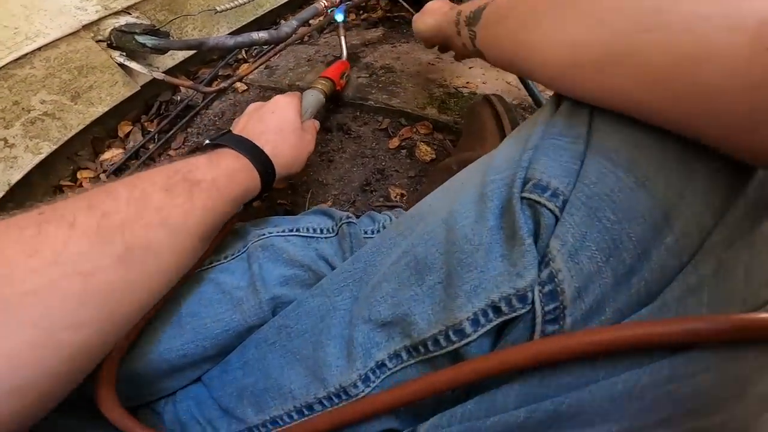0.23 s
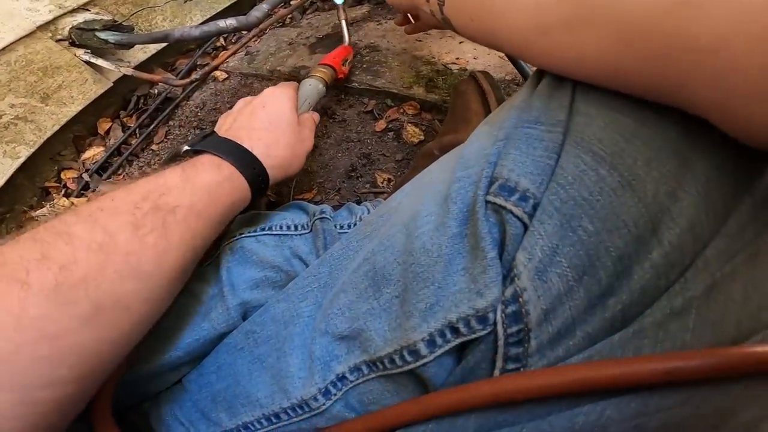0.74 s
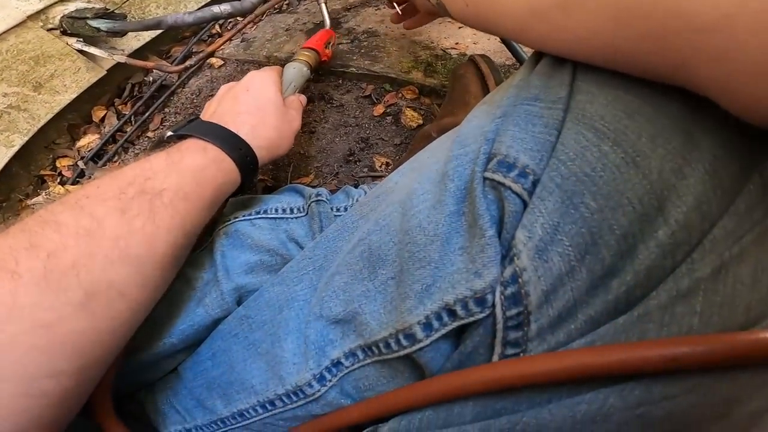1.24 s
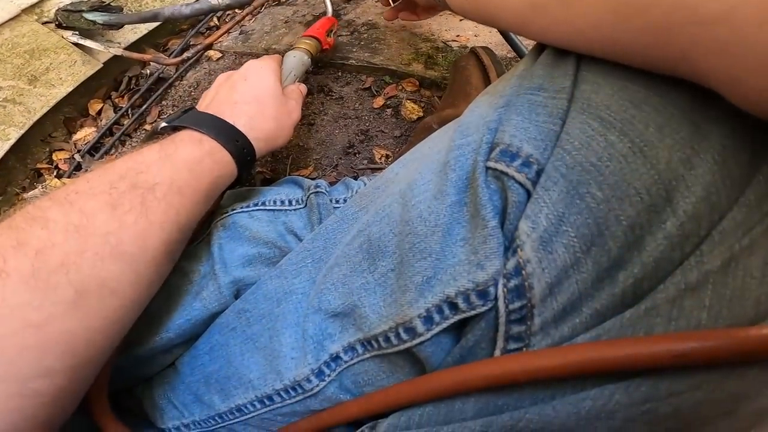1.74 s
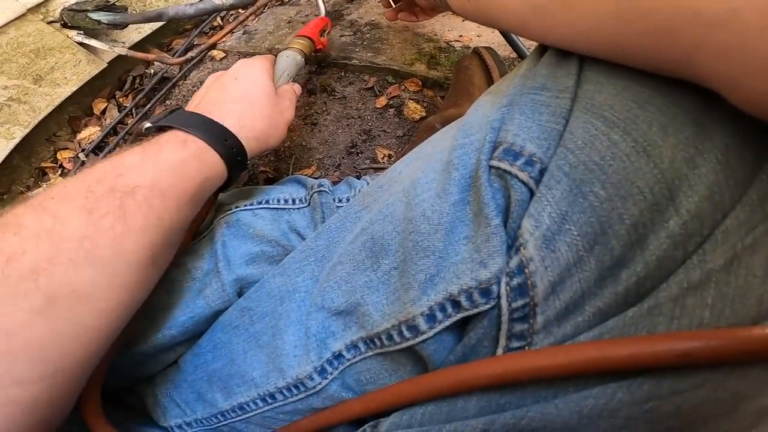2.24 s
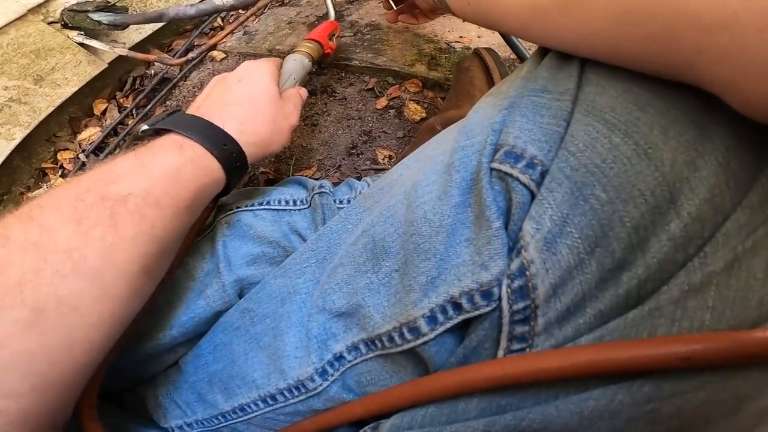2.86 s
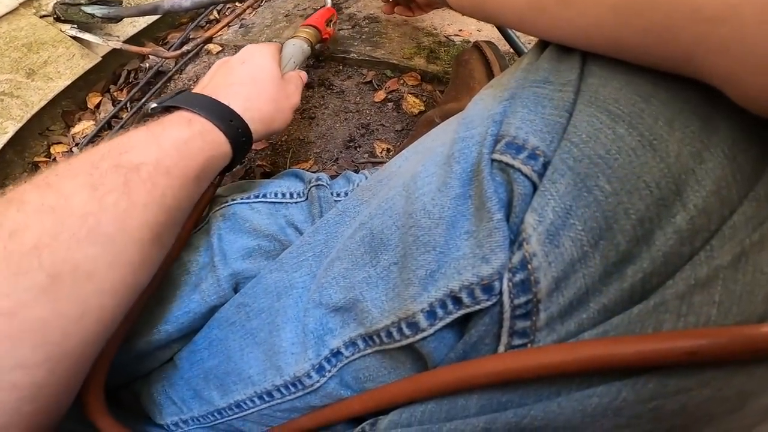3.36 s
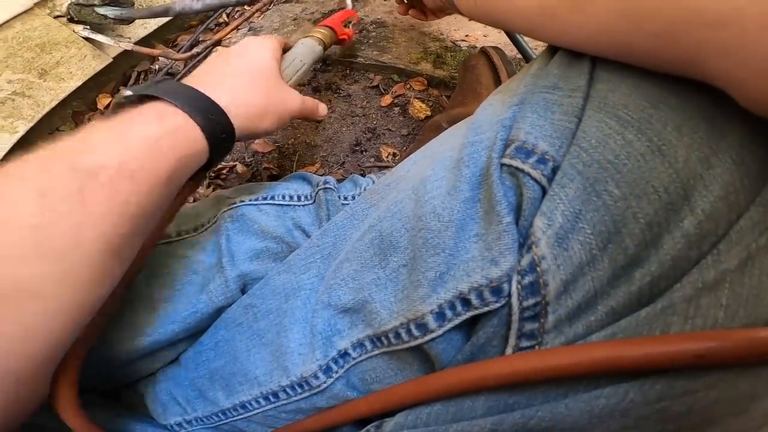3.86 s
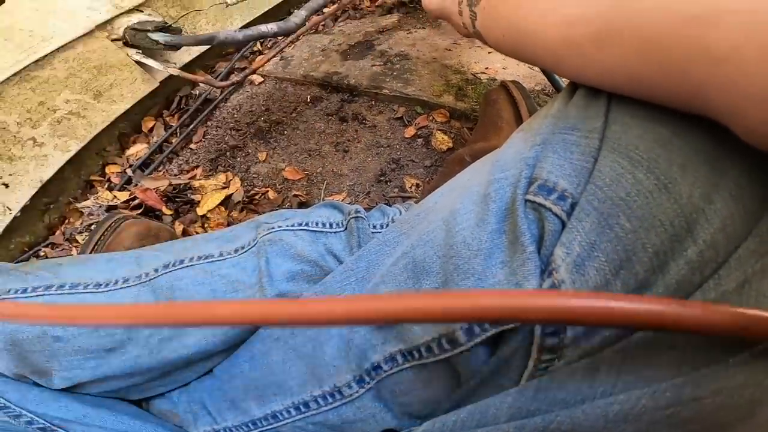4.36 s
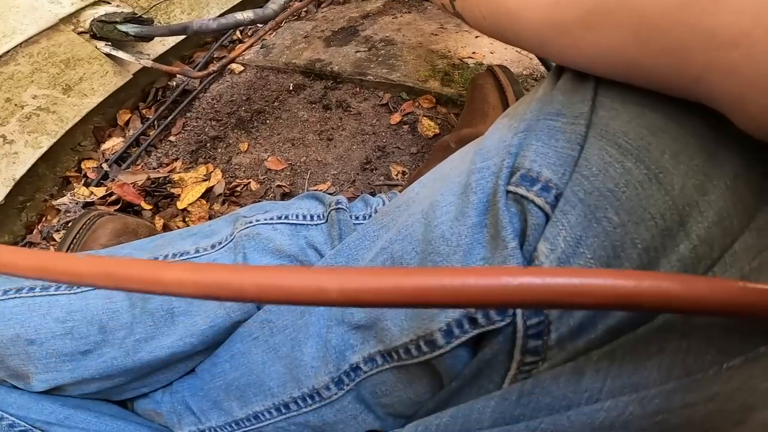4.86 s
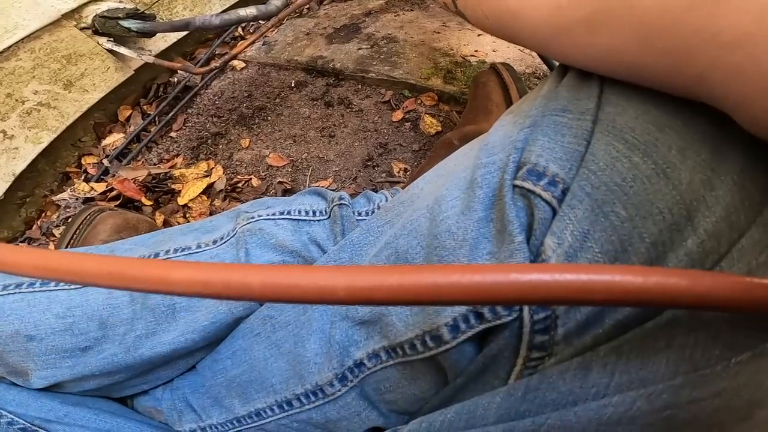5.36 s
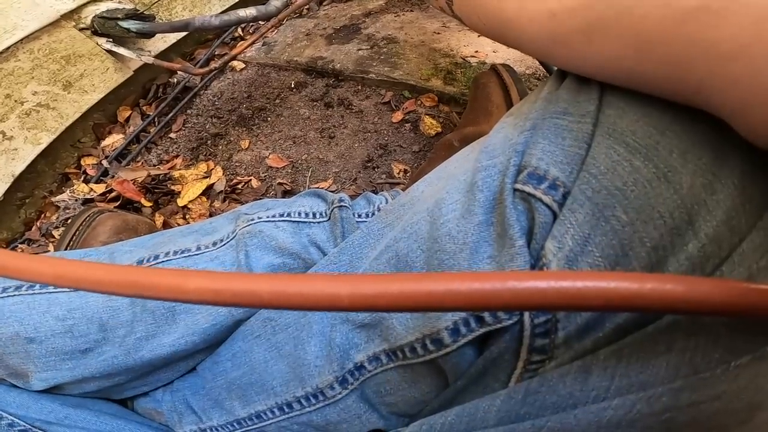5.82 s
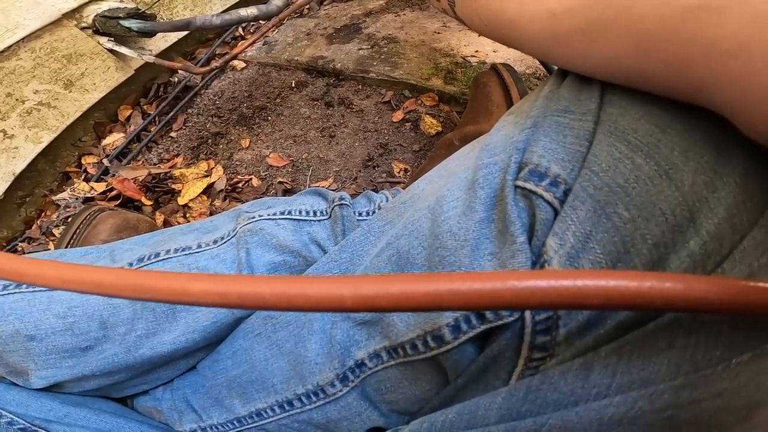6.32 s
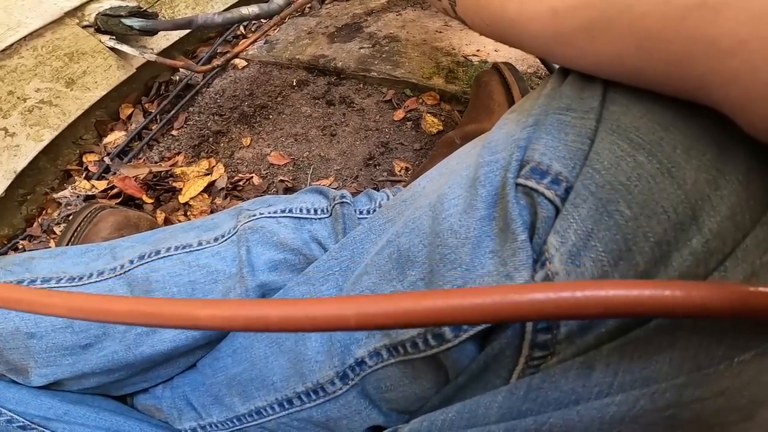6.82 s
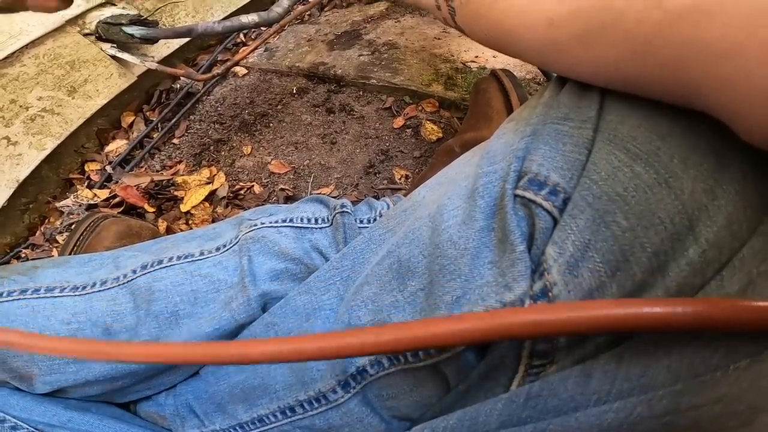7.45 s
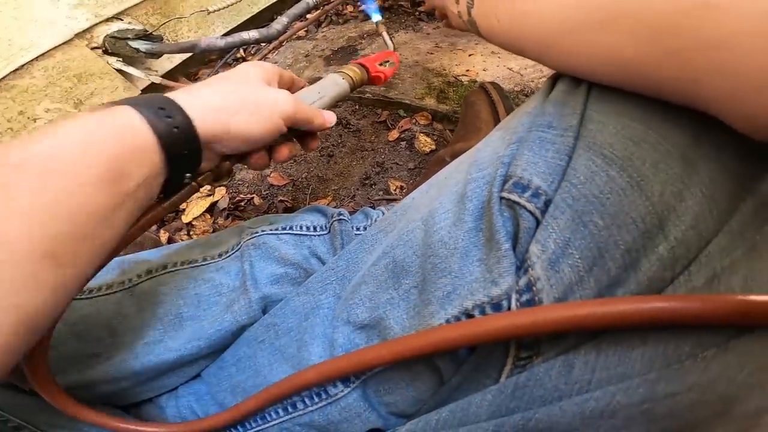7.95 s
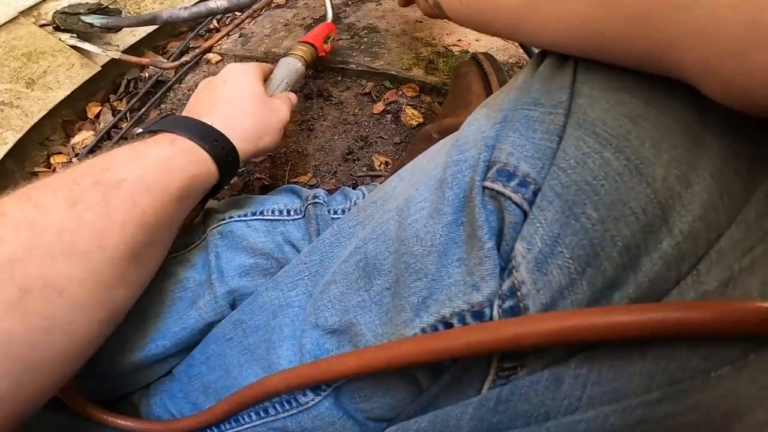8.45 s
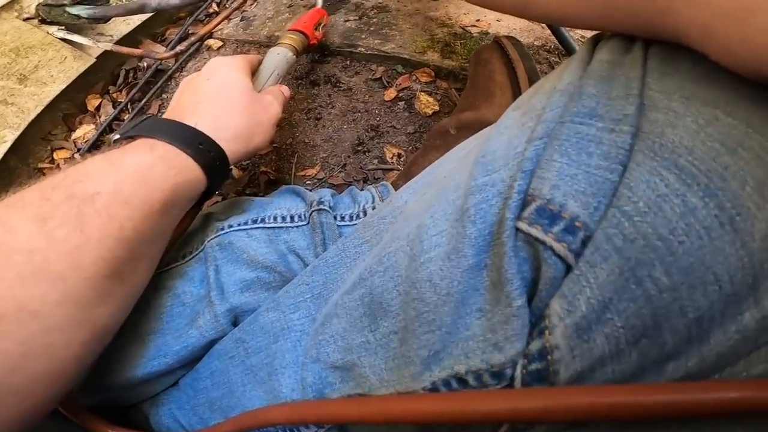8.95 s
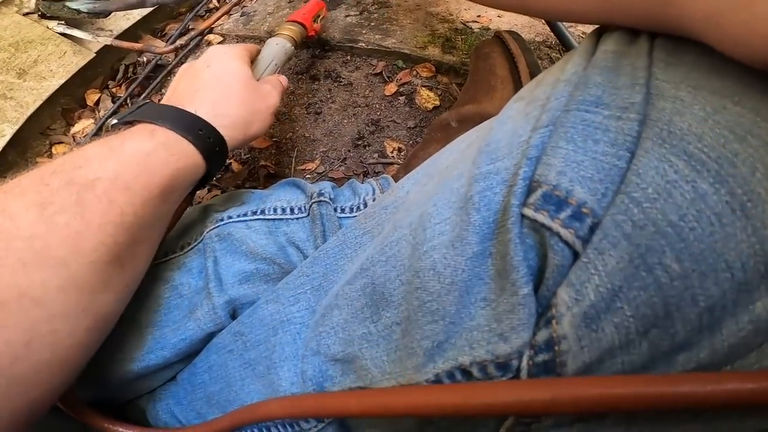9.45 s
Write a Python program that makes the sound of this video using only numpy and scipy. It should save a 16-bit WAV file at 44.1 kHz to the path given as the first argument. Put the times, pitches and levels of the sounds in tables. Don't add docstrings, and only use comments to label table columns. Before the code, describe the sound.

Constant, dense jet noise from a brazing torch at arm's length, mostly a bright mid-high hiss with a blurry whistling edge and much quieter low rumble. Close reflections from wall, ground and body give it a hollow, flanger-like colour that slides whenever the hand moves: briefly at first, then moving away midway and coming back later. Level stays nearly even, with slight flutter. A distant motor hums faintly below in the last second or so.

```python
import sys
import numpy as np
from scipy import signal
from scipy.fft import rfft, irfft
from scipy.io import wavfile
from scipy.ndimage import uniform_filter1d, map_coordinates

SR = 44100
rng = np.random.default_rng(int(sys.argv[2]) if len(sys.argv) > 2 else 0)


def unload_audio(sound):
    columns = np.transpose(np.atleast_2d(sound))
    steps = np.round(np.clip(columns, -1, 1) * 32767)
    wavfile.write(sys.argv[1], SR, steps.astype(np.int16))


def level_to_linear(level):
    exponent = np.asarray(level, float) / 20
    return 10 ** exponent


N = 427329
FRAME = 1024


def along(points, hz):
    point_hz, value = np.transpose(points)
    return np.interp(np.log(hz + 1), np.log(point_hz + 1), value)


def curves(rows, t):
    row_s, *columns = np.transpose(rows)
    return [np.interp(t, row_s, column) for column in columns]


def noise(channels):
    return signal.stft(rng.standard_normal((channels, N)), SR, "cosine", FRAME)


def wobble(knots_per_s, t):
    knots = rng.standard_normal(int(N / SR * 60) + 4)
    return map_coordinates(knots, [t * knots_per_s])


def shaped(gain):
    all_but_time = tuple(range(gain.ndim - 1))
    return gain / np.sqrt(np.mean(gain ** 2, axis=all_but_time))


def delayed(hz, extra_ms):
    return np.exp(-2j * np.pi / 1000 * hz * extra_ms)


# start_s, level_db
ENGINE_LEVEL = [
    (0.0, -52),
    (0.13, -43),
    (6.48, -58),
    (6.8, -63),
    (7.21, -54),
    (8.53, -36),
    (9.07, -49),
    (9.69, -37),
]


def engine():
    firing_hz, half_width_hz = 71, 4
    hz = np.fft.rfftfreq(N, 1 / SR)
    line = 1 / (1 + ((hz - firing_hz) / half_width_hz) ** 2)
    hum = irfft(rfft(rng.standard_normal(N)) * line, N)
    level_db = curves(ENGINE_LEVEL, np.arange(N) / SR)[0] - 3
    return hum / hum.std() * level_to_linear(level_db)


# start_s, travel_cm
TRAVEL = [(0, 1), (.45, 6.8), (1.3, 7.8), (3.85, 15.7), (4.55, 48), (5, 67.4), (6.3, 58.8), (7.5, 57),
          (8.1, 94), (8.9, 103), (9.69, 89)]


def late_cloud(hz, t, count=10):
    skew_ms = 0.25
    spread, facing, skew = rng.uniform(-1, 1, (count, 3)).T[..., None, None]
    travel_cm = curves(TRAVEL, t)[0]
    swing = 1 + np.abs(np.gradient(travel_cm, t)) / 70
    travel_ms = facing * travel_cm / 34.3
    path_ms = 3 + 1.6 * spread + travel_ms + skew_ms * skew * [[1], [-1]]
    cloud = sum(delayed(hz[:, None], ms[:, None]) for ms in path_ms)
    return swing * cloud / np.sqrt(count)


# extra_left_ms, extra_right_ms, signed_strength
UNDER = [(0.288, 0.254, -0.05), (0.3, 0.289, 0.13), (0.779, 0.776, -0.21), (0.908, 0.898, 0.12),
         (0.956, 0.971, -0.09), (1.159, 1.136, 0.09), (1.205, 1.198, 0.1), (1.332, 1.307, 0.04),
         (1.61, 1.608, -0.1), (1.701, 1.685, -0.15), (1.747, 1.812, 0.07), (1.992, 2.009, -0.1),
         (2.347, 2.437, 0.06), (2.858, 2.858, -0.04)]
BESIDE = [(0.303, 0.244, -0.01), (0.468, 0.55, -0.08), (0.66, 0.701, -0.13), (0.761, 0.766, -0.15),
          (0.964, 0.953, -0.15), (1.126, 1.118, 0.08), (1.555, 1.621, -0.12), (1.675, 1.703, -0.16),
          (1.967, 1.976, -0.06), (2.046, 2.072, -0.08), (2.216, 2.393, 0.05), (2.496, 2.52, -0.04),
          (2.598, 2.569, 0.04), (2.717, 2.736, -0.05)]
ABOVE = [(0.656, 0.698, -0.14), (0.749, 0.74, -0.07), (0.911, 0.907, -0.15), (1.098, 1.089, 0.12),
         (1.371, 1.279, 0.06), (1.498, 1.481, -0.1), (1.645, 1.669, -0.1), (1.721, 1.749, -0.09),
         (1.974, 2.032, -0.09), (2.25, 2.2, 0.08), (2.356, 2.359, 0.05), (2.474, 2.478, -0.05),
         (2.977, 3.013, 0.03), (3.197, 3.227, 0.05)]
BEHIND = [(0.419, 0.353, 0.11), (0.553, 0.571, 0.03), (0.902, 0.896, -0.15), (1.035, 1.021, 0.15),
          (1.121, 1.109, 0.1), (1.269, 1.204, 0.07), (1.607, 1.657, -0.1), (1.802, 1.791, 0.09),
          (1.925, 1.92, -0.07), (2.017, 2.004, -0.11), (2.278, 2.183, 0.09), (2.352, 2.319, 0.09),
          (2.445, 2.569, -0.05), (2.637, 2.664, 0.03)]
ASIDE = [(0.265, 0.274, -0.16), (0.292, 0.302, 0.22), (0.58, 0.538, 0.12), (0.621, 0.701, -0.09),
         (0.821, 0.804, -0.07), (1.074, 1.06, 0.1), (1.354, 1.361, 0.1), (1.504, 1.494, -0.12),
         (1.698, 1.704, -0.06), (2.001, 2.007, -0.12), (2.039, 2.162, 0.07), (2.212, 2.217, 0.04),
         (2.959, 2.967, 0.04), (3.165, 3.246, 0.05)]
LIFTED = [(0.42, 0.412, -0.09), (0.669, 0.684, 0.11), (0.752, 0.725, -0.05), (0.85, 0.856, -0.15),
          (1.0, 1.044, 0.09), (1.204, 1.179, 0.12), (1.589, 1.64, -0.11), (1.908, 1.912, -0.11),
          (2.137, 2.148, 0.09), (2.676, 2.692, 0.06)]
SWUNG = [(0.268, 0.26, -0.24), (0.659, 0.601, 0.19), (1.02, 0.992, 0.06), (1.107, 1.113, -0.1),
         (1.167, 1.246, -0.07), (1.358, 1.331, -0.09), (1.763, 1.777, 0.1), (1.997, 1.99, -0.09),
         (2.319, 2.286, -0.06), (2.748, 2.75, 0.06)]
TURNED = [(0.323, 0.264, -0.16), (0.352, 0.431, 0.17), (0.604, 0.585, 0.06), (0.741, 0.727, -0.13),
          (1.353, 1.349, -0.07), (1.649, 1.617, 0.12), (2.445, 2.458, -0.06), (2.614, 2.573, 0.07),
          (3.143, 3.279, -0.07), (3.792, 3.741, 0.05)]
RESTING = [(0.243, 0.247, -0.13), (0.331, 0.347, 0.06), (0.529, 0.575, 0.02), (0.736, 0.764, -0.06),
           (0.869, 0.919, -0.07), (1.092, 1.082, 0.09), (1.284, 1.286, 0.05), (1.52, 1.531, -0.12),
           (1.712, 1.729, -0.05), (1.827, 1.84, -0.05), (2.001, 2.008, -0.11), (2.543, 2.544, 0.06),
           (2.662, 2.697, -0.04), (2.779, 2.833, -0.04)]
PULLED = [(0.393, 0.343, -0.08), (0.431, 0.435, 0.12), (0.819, 0.703, -0.08), (1.217, 1.212, 0.09),
          (1.734, 1.796, -0.05), (1.851, 1.833, 0.04), (2.192, 2.18, -0.07), (2.56, 2.562, 0.07),
          (3.361, 3.319, -0.05), (3.652, 3.686, 0.04)]
RAISED = [(0.251, 0.276, 0.14), (0.417, 0.433, 0.13), (0.693, 0.68, -0.08), (0.78, 0.759, -0.12),
          (0.862, 0.852, -0.19), (1.183, 1.19, 0.12), (1.314, 1.268, 0.09), (1.667, 1.658, -0.15),
          (1.86, 1.868, 0.05), (2.743, 2.726, -0.05)]
LEANING = [(0.352, 0.388, 0.08), (0.497, 0.529, -0.13), (0.546, 0.555, 0.16), (0.725, 0.714, -0.15),
           (0.865, 0.859, 0.14), (0.907, 0.906, -0.15), (1.054, 1.049, 0.07), (1.233, 1.29, 0.09),
           (1.427, 1.437, 0.06), (1.541, 1.542, -0.1), (1.702, 1.784, -0.08), (2.322, 2.289, 0.08),
           (2.514, 2.499, -0.05), (3.179, 3.177, 0.04)]
# start_s, pose_reached, path_stretch_ratio
HAND = [(0, UNDER, 1.01), (.15, LIFTED, 0.98), (.28, LIFTED, 1), (.35, UNDER, 0.89), (.45, UNDER, 1.019),
        (1.12, UNDER, 0.983), (1.4, BESIDE, 0.97), (2.1, BESIDE, 1.01), (2.3, LEANING, 0.99),
        (2.85, LEANING, 1.01), (3.05, ABOVE, 1.004), (3.88, ABOVE, 1.01), (3.98, PULLED, .98),
        (4.15, PULLED, 1.02), (4.27, SWUNG, 1.02), (4.44, SWUNG, 1), (4.52, ASIDE, 1.075), (5.1, ASIDE, 1),
        (6.5, ASIDE, 1.014), (7.0, RESTING, 1.004), (7.5, RESTING, 1.02), (7.63, RESTING, 1.106),
        (7.78, TURNED, 1.001), (8.0, UNDER, 1), (8.12, RAISED, 1), (8.3, RAISED, 1.01),
        (8.42, UNDER, 1.005), (8.65, BESIDE, 1.05), (8.82, ABOVE, 1.04), (8.95, BEHIND, 1.001)]


def near_walls(hz, t):
    move_s, reached, stretch = zip(*HAND)
    tremor = 0.004 * wobble(3, t)
    grid_hz = 4
    fine_hz = np.arange(SR // 6) * grid_hz
    stretched_hz = hz[:, None] * (np.interp(t, move_s, stretch) + tremor)
    slid = np.rint(stretched_hz / grid_hz).astype(int)

    def comb(pose):
        return sum(strength * delayed(fine_hz, np.array([[left_ms], [right_ms]]))
                   for left_ms, right_ms, strength in pose)

    poses = [UNDER, BESIDE, LEANING, ABOVE, BEHIND, ASIDE, RESTING, LIFTED, PULLED, SWUNG, TURNED, RAISED]
    walls = 0
    for pose in poses:
        share = np.interp(t, move_s, [other == pose for other in reached])
        walls = walls + comb(pose)[:, slid] * share
    return walls


# freq_hz, left_minus_right_db
PORTS = [(120, 1.5), (300, 1.5), (600, 1), (1100, -0.5), (1900, 9.5), (2500, 3.5), (3000, 0.9), (3600, 4),
         (4200, 0), (5200, -1), (6500, 2.5), (8000, -0.5), (10500, -2)]
# freq_hz, level_db
LATE = [(100, -26), (1200, -18), (3500, -13), (6000, -6), (12000, -2)]


def paths_to_ports(hz, t):
    dull = 1 / np.sqrt(1 + (hz / 12000) ** 2)
    port_delay = delayed(hz, np.array([[0.016], [0]]))
    ports = level_to_linear(np.array([[0.5], [-0.5]]) * along(PORTS, hz)) * port_delay
    near = 1 + 1.81 * dull[:, None] * near_walls(hz, t)
    late = 1 + level_to_linear(along(LATE, hz))[:, None] * late_cloud(hz, t)
    return ports[..., None] * near * late


# start_s, beat_on_pipe_and_wall_db, nozzle_facing_camera_db
FLAME = [(0.0, -33.5, -34.5), (0.19, -31.5, -31), (0.67, -32.5, -38.5), (1.29, -32.5, -35.5),
         (2.78, -34, -37), (3.26, -32, -35.5), (5.18, -34, -37.5), (5.23, -35.5, -38), (7.02, -34.5, -37),
         (7.31, -32.5, -38), (7.72, -30.5, -34.5), (8.02, -32.5, -37), (9.55, -30.5, -35), (9.69, -30, -38)]
# start_s, centre_hz, level_db
GLIDING_PEAK = [(0.0, 3430, -19.5), (0.2, 3700, -40), (0.32, 4020, -30), (0.46, 3570, -23.5), (0.86, 3370, -27),
                (2.24, 3690, -30), (2.91, 3390, -26.5), (3.3, 3870, -35), (3.93, 3590, -25), (4.3, 3400, -28),
                (4.5, 3390, -23.5), (5.0, 3690, -25.5), (6.5, 3860, -24), (7.45, 3650, -31), (7.62, 3340, -27),
                (7.8, 3500, -35), (8.6, 3400, -27), (9.1, 3700, -31)]
# freq_hz, density_db_per_hz
ROAR = [(20, -18), (45, -7.5), (120, 3), (340, -0.5), (380, -5.5), (420, -6), (570, -4.5), (690, -11),
        (930, -4), (1100, -8), (1500, -30.5), (2200, -50)]
# freq_hz, density_db_per_hz
HISS = [(800, -69), (1200, -11), (1700, -20.5), (1900, -22.5), (2500, -6), (3000, -7.5), (3600, 0),
        (4200, -4.5), (5200, -11), (6500, -18), (8000, -40)]
# freq_hz, density_db_per_hz
FIZZ = [(5000, -64), (6500, 5), (8000, 5), (10000, -9), (12000, -11.5), (14000, -47), (15500, -48)]


def jet_layers(hz, t):
    roar_over_beat_db, mean_hiss_db, fizz_over_facing_db = 1.5, -18.5, 5
    hiss_db_per_beat_db = 0.11
    beat_db, facing_db = curves(FLAME, t)
    centre_hz, peak_db = curves(GLIDING_PEAK, t)
    flicker = wobble(9, t)
    roar_db = beat_db + roar_over_beat_db + 0.17 * wobble(4.3, t)
    hiss_db = mean_hiss_db + hiss_db_per_beat_db * (beat_db - beat_db.mean()) - 0.54 + 0.56 * flicker
    fizz_db = facing_db + fizz_over_facing_db + 0.73 * flicker + 0.81 * wobble(25, t)
    narrow_peak = 1 / (1 + ((hz[:, None] - centre_hz) / 80) ** 2)
    return [(level_to_linear(along(ROAR, hz))[:, None], roar_db),
            (level_to_linear(along(HISS, hz))[:, None], hiss_db),
            (level_to_linear(along(FIZZ, hz))[:, None], fizz_db),
            (narrow_peak, peak_db)]


# freq_hz, level_db
SCATTER = [(30, -13), (250, -18), (900, -10.5), (3500, -15.5), (6000, -13), (12000, -10)]


def torch():
    hz, t, jet = noise(1)
    paths = paths_to_ports(hz, t)
    power = sum((shaped(shape * np.abs(paths)) * level_to_linear(level_db)) ** 2
                for shape, level_db in jet_layers(hz, t))
    heard = np.sqrt(power)
    direct = heard * paths / np.abs(paths) * jet
    smooth = np.sqrt(uniform_filter1d(heard ** 2, size=25, axis=1))
    around = smooth * level_to_linear(along(SCATTER, hz))[:, None] * noise(2)[2]
    return signal.istft(direct + around, SR, "cosine", FRAME)[1][:, :N]


def scene():
    return torch() + engine()


def roll_off(x):
    return signal.sosfilt(signal.butter(12, 15550, fs=SR, output="sos"), x)


def record(dry):
    return roll_off(dry)


dry = scene()
out = record(dry)
unload_audio(out)
```